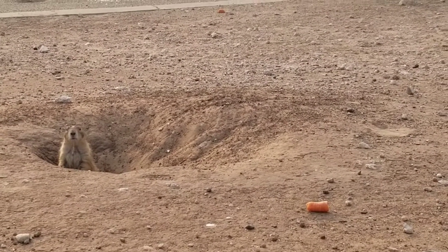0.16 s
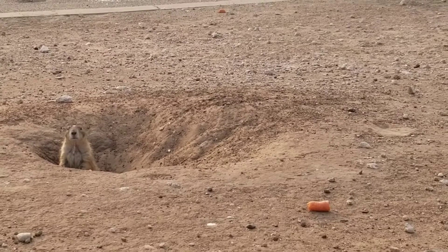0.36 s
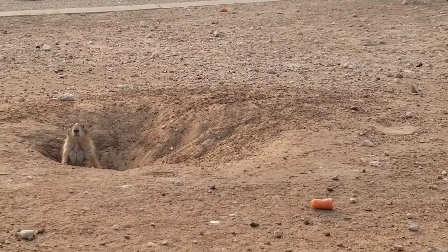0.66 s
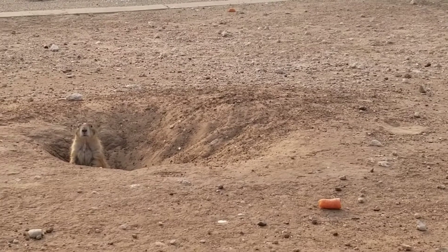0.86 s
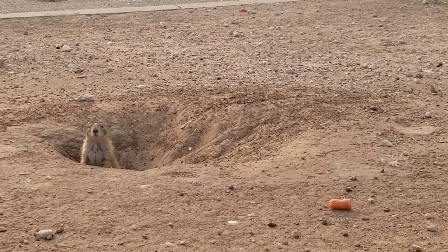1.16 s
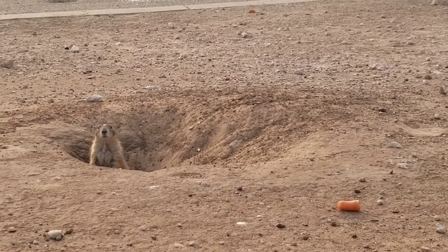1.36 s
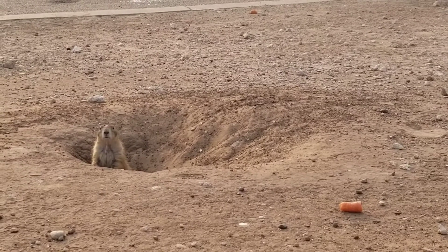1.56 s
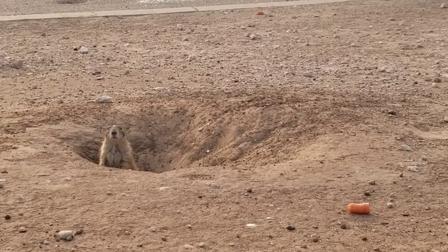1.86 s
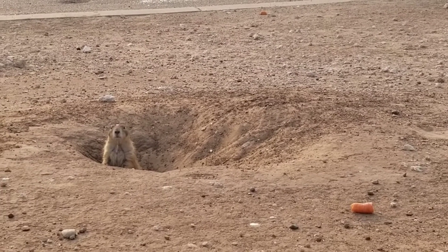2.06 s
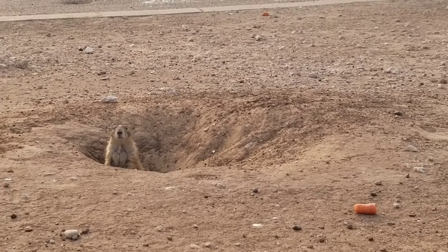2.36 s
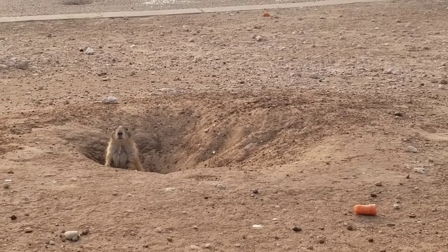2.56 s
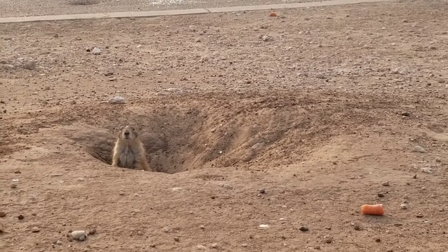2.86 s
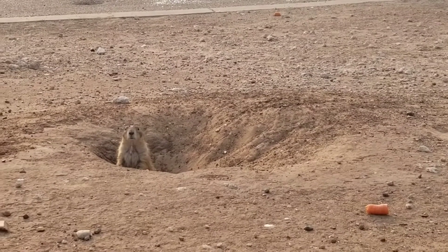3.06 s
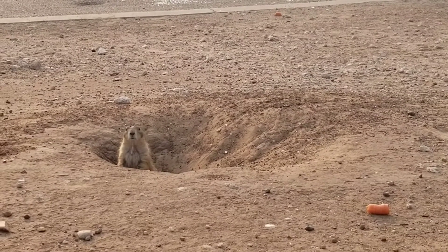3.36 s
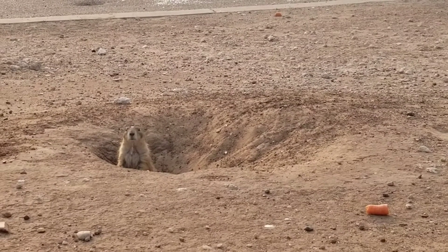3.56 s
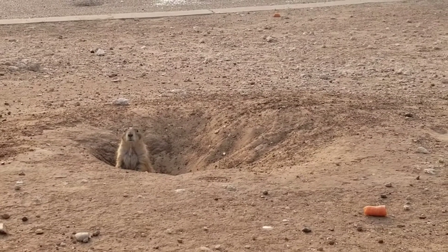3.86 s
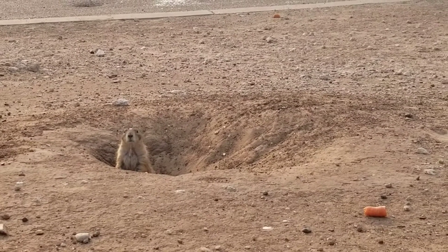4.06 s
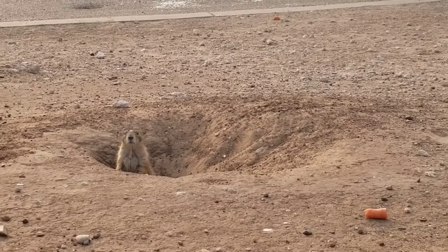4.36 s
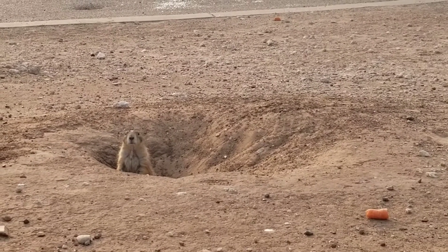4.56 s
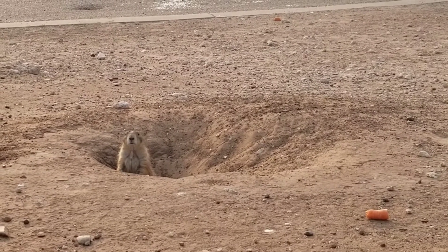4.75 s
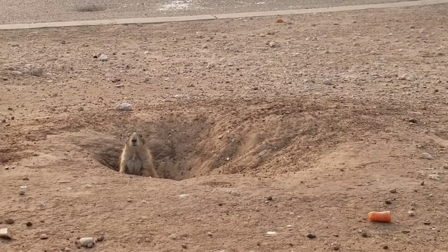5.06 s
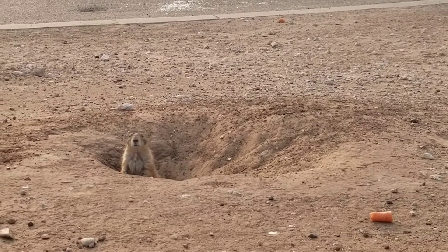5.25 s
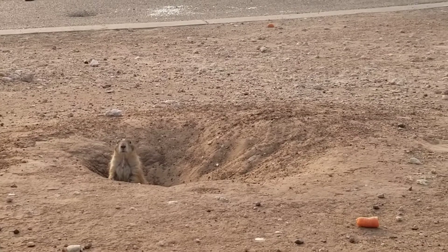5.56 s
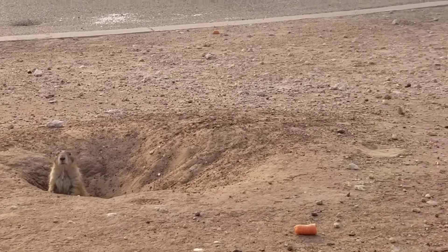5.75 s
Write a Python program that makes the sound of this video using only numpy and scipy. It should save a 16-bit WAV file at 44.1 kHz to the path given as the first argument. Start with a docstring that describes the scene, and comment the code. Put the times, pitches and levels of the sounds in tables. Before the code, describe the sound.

An open, windy dirt colony heard through an unprotected stereo microphone. A soft scuff and a gust open the scene, with low rumble, ragged flutter and dull thumps. A thin, cracking high bark comes at 0.2 s, a very faint distant one at 0.5, then more thin barks near 0.8, 1.1 and 1.4, the middle ones amid another gust around 0.8 to 1.3. The wind drops, and a close animal barks clearly at 1.9 s: a sharp, raspy chirp of about a twentieth of a second, falling at its end. Faint far yips follow every third of a second or so until 4. From 2.6 gusts return, thumping heavily between 3.2 and 4.8. The loudest close bark lands at 4.2, with others at 4.65 and 5.1. A thin bark at 5.4 and a faint one at 5.75 precede a last strong gust. Echoes are slight and diffuse.

```python
"""A windy, open dirt colony of prairie dogs: quiet outdoor air and a soft scuff open the scene.
Gusts soon buffet two microphone ports with rumble, flutter, crackle and dull thumps, and return throughout.
A neighbour with a thin cracking voice barks first, then animals far off, then one close by at its burrow.
Each bark is a short arch of pitch that turns harsh along the way and scatters faintly over the ground."""
import sys
import numpy as np
from scipy import signal
from scipy.fft import rfft, irfft, next_fast_len
from scipy.io import wavfile
from scipy.ndimage import map_coordinates

SR = 44100
rng = np.random.default_rng(int(sys.argv[2]) if len(sys.argv) > 2 else 0)


def unload_wav(signal):
    """Save mono or channel-first audio to the path in sys.argv[1] as 16-bit WAV at rate SR, clipped to [-1, 1]."""
    wavfile.write(
        sys.argv[1],
        SR,
        np.round(np.clip(np.atleast_2d(signal).T, -1, 1) * 32767).astype(np.int16),
    )


N = 259749  # samples in the scene


def amp(db):
    """Decibels to gain."""
    return 10 ** (np.asarray(db) / 20)


def unit(x):
    """Scale to an average (rms) strength of 1."""
    return x / np.sqrt(np.mean(x ** 2) + 1e-20)


def along(points, hz):
    """Read a curve of (frequency, value) points on a log-frequency axis."""
    f, v = np.transpose(points)
    return np.interp(np.log(hz + 1), np.log(f + 1), v)


def curves(rows, at):
    """Read each column after the first at the given places."""
    places, *columns = np.transpose(rows)
    return [np.interp(at, places, column) for column in columns]


def wobble(rate, n):
    """A smooth random curve through `rate` random points a second."""
    knots = rng.standard_normal(int(n * rate / SR) + 4)
    return map_coordinates(knots, [np.arange(n) * rate / SR + 1], mode="nearest")


def filtered(x, response):
    """Reshape a sound's spectrum by a function of frequency."""
    n = x.shape[-1]
    padded = next_fast_len(n + 4096)
    hz = np.fft.rfftfreq(padded, 1 / SR)
    return irfft(rfft(x, padded) * response(hz), padded)[..., :n]


def noise(spectrum):
    """Steady noise of rms 1, unrelated at the two ports."""
    return unit(filtered(rng.standard_normal((2, N)), lambda hz: amp(along(spectrum, hz))))


def panned(pan_db):
    """Left and right gains of mean power 1; positive means louder on the left."""
    gains = amp(np.array([[.5], [-.5]]) * pan_db)
    return gains / np.sqrt(np.mean(gains ** 2, axis=0))


def bump(hz, centre_hz, octaves):
    """A bell-shaped rise around one frequency, on a log axis."""
    return np.exp(-.5 * (np.log2((hz + 1) / centre_hz) / octaves) ** 2)


def add(track, s, sound):
    """Mix a sound into the track at time s."""
    start = max(round(s * SR), 0)
    track[:, start:start + sound.shape[1]] += sound[:, :N - start]


# Tone of the quiet air: (frequency [Hz], relative level [dB])
AIR_TONE = [(18, -45), (30, -6.5), (85, -3.5), (173, -19.5), (299, -8), (639, -19), (728, -20.5),
            (971, -22), (1510, -28), (1640, -30), (2070, -29), (2620, -32.5), (3590, -36), (9440, -42.5),
            (15500, -38.5)]
# How much the ports differ: (frequency [Hz], difference over sum [dB])
AIR_WIDTH = [(60, -4), (110, -2), (200, -9), (380, -11), (700, 0), (1290, 8.5), (2380, -2), (4400, 0),
             (8120, 1), (15000, -0.5)]


def air():
    """The quiet outdoor floor: noise partly shared by both ports."""
    mid, side = noise(AIR_TONE)
    side = filtered(side, lambda hz: amp(along(AIR_WIDTH, hz)))
    return amp(-57.5) * np.array([mid + side, mid - side])


# Soft rubs: (time [s], length [s], level before the fades [dB], centre [Hz], width [octaves])
SCUFFS = [(0, 0.038, -57.5, 1860, 0.15), (0.055, 0.08, -55, 1860, 0.23), (1.021, 0.046, -53.5, 2030, 0.24),
          (1.303, .03, -57, 2150, 0.096), (1.316, 0.081, -62.5, 2400, 0.28),
          (2.277, 0.063, -60, 2000, 0.12), (2.918, 0.17, -59, 1690, 0.38), (2.935, 0.11, -64, 4960, 0.58),
          (3.972, 0.054, -62, 6200, 0.35)]


def scuffs():
    """Brief soft rubs: uneven noise around one pitch that swells and fades."""
    out = np.zeros((2, N))
    for s, length, db, centre_hz, octaves in SCUFFS:
        n = int(length * SR)
        grit = rng.standard_normal((2, n)) * amp(3 * wobble(250, n))
        rub = unit(filtered(grit, lambda hz: bump(hz, centre_hz, octaves)))
        add(out, s, amp(db) * rub * signal.windows.tukey(n, .8))
    return out


STIFF_DB = -35  # strength of a typical gust
FLUTTER_DB, FLUTTER_GROWS = -37.5, 1.29  # level in a typical gust, dB gained per dB of strength
CRACKLE_DB, CRACKLE_GROWS = -56.5, 0.83  # level in a typical gust, dB gained per dB of flutter


def flutter_of(strength_db):
    """The stronger the wind, the more it flutters."""
    return amp(FLUTTER_DB + FLUTTER_GROWS * (strength_db - STIFF_DB))


def crackle_of(flutter):
    """The harder the flutter, the more it crackles."""
    return amp(CRACKLE_DB) * (flutter / amp(FLUTTER_DB)) ** CRACKLE_GROWS


def lumps(depth_db, rate):
    """Turbulent swells of mean power 1, different at each port."""
    return unit(amp(depth_db * np.tanh([wobble(rate, N), wobble(rate, N)])))


# Wind between gusts, before a random wobble: (time [s], strength [dB])
BREEZE = [(0, -49), (.6, -57), (1, -35.5), (1.48, -58), (1.7, -50.5), (2.1, -63), (2.38, -59.5),
          (2.55, -49), (2.75, -56), (3.2, -45), (4.2, -47), (4.95, -51), (5.3, -47.5), (5.89, -46.5)]
# Gusts: (time of full strength [s], hold [s], strength [dB], flutter boost [dB],
#         crackle boost [dB], left over right [dB])
GUSTS = [(0.046, 0.074, -30.5, 3, -2.5, -2.5), (0.244, 0.16, -41.5, -2.5, -11, -0.5),
         (0.854, 0.11, -42, 6.5, 7.5, -5), (1.028, 0.086, -39, 5.5, 0, 1),
         (1.192, 0.14, -33, -5.5, -3, 1.5), (2.585, 0.018, -35.5, -11.5, 4, 6),
         (2.817, 0.076, -34.5, 4.5, -5, -3), (2.929, .1, -45.5, -16, 16.5, -3),
         (3.155, 0.2, -41, 0.5, 3, 4), (3.52, 0.083, -36, -2.5, -2, -1), (3.634, 0.21, -37, 3, 4.5, -0.5),
         (3.895, 0.14, -39.5, -2, 2, 0.5), (4.307, 0.23, -33, -2.5, 2, -3),
         (4.625, .14, -32.5, -3.5, -3, -2), (5.056, 0.079, -30, -3, -0.5, -3.5),
         (5.151, 0.074, -34, -7, -2, 2), (5.36, 0.042, -40.5, -9.5, -8, -18),
         (5.485, 0.046, -36.5, -2.5, -20, -2), (5.687, 0.041, -33.5, -1.5, -1.5, -3),
         (5.766, 0.13, -28.5, -5.5, -6.5, -2.5)]
GUST_RISE_DB_PER_S, GUST_FALL_DB_PER_S = 323.5, 191.5


def gusts(t):
    """Each gust rises, holds and dies over the breeze: gains of rumble, flutter and crackle."""
    breeze_db = curves(BREEZE, t)[0] + 1.4 * wobble(7.2, N)
    # add powers here, and return to gains at the end
    rumble, flutter = amp(breeze_db) ** 2, flutter_of(breeze_db) ** 2
    crackle = crackle_of(flutter_of(breeze_db)) ** 2
    for s, hold, db, flutter_db, crackle_db, pan_db in GUSTS:
        rise_db = GUST_RISE_DB_PER_S * np.maximum(s - t, 0)
        fall_db = GUST_FALL_DB_PER_S * np.maximum(t - s - hold, 0)
        strength_db = db - rise_db - fall_db
        churn = amp(flutter_db) * flutter_of(strength_db)
        ports = panned(pan_db) ** 2
        rumble = rumble + ports * amp(strength_db) ** 2
        flutter = flutter + ports * churn ** 2
        crackle = crackle + ports * (amp(crackle_db) * crackle_of(churn)) ** 2
    return np.sqrt(rumble), np.sqrt(flutter), np.sqrt(crackle)


# Single eddies striking a port: (time [s], thump peak before softening [dB],
#         peak strength of flutter in the wake [dB], left over right [dB])
EDDIES = [(0.025, -26, -38, 5), (.056, -36, -31, -8), (0.111, -18, -39, 21), (0.179, -22, -37.5, -2),
          (0.276, -32, -64, 10), (0.838, -44, -47, 0), (1.001, -33, -33, -2), (1.045, -21.5, -30.5, 2),
          (1.096, -35, -20, -8.5), (1.181, -26, -43, -8), (1.237, -24, -29, -5), (2.665, -38, -41.5, 3),
          (2.818, -29, -35.5, 10), (3.188, -39, -33, -24), (3.287, -28, -35.5, -1), (3.33, -32, -48, 8),
          (3.421, -22, -46, -0.5), (3.455, -29, -43.5, -9), (3.587, -44, -45, -17), (3.651, -21, -30, -6),
          (3.765, -17.5, -23, -7.5), (3.811, -30, -27, -24), (3.902, -23, -35.5, -6.5), (4.01, -25, -33, 3),
          (4.126, -25.5, -63, -10), (4.341, -21, -29, -6.5), (4.389, -17.5, -28.5, 0.5),
          (4.453, -25, -29.5, 5), (4.514, -25.5, -28.5, 6), (4.584, -25.5, -32.5, -2),
          (4.637, -14.5, -30, -2.5), (4.698, -22, -24.5, -5.5), (4.764, -20, -48, 6.5),
          (4.829, -31, -38, 0), (5.098, -22, -24, -2.5), (5.699, -31, -37.5, -1), (5.72, -20, -54, 3.5),
          (5.776, -23.5, -24, -2.5), (5.857, -13, -31.5, -3)]


def wakes(peak_s=0.0082):
    """Each eddy drags a short burst of flutter behind it: these are the bursts' gains."""
    out = np.zeros((2, N))
    u = np.arange(SR // 10) / SR / peak_s
    for s, _, wake_db, pan_db in EDDIES:
        add(out, s, amp(wake_db) * panned(pan_db) * u * np.exp(1 - u))
    return out


# Tones of the wind, each: (frequency [Hz], relative level [dB])
RUMBLE_TONE = [(15, -31), (35, -3.5), (65, 2.5), (110, -1), (170, -7), (260, -19), (500, -53), (1000, -90)]
FLUTTER_TONE = [(70, -38.5), (150, -9.5), (230, -2), (400, 2.5), (520, -7), (750, -17), (1100, -39.5),
                (2200, -61.5), (6000, -57), (15000, -80.5)]
CRACKLE_TONE = [(400, -27), (800, 12), (1200, 2.5), (2000, -8.5), (3000, -24), (6000, -44.5),
                (15000, -48.5)]


def wind():
    """Gusts press on the ports: a slow rumble, a ragged flutter, and crackle on the flutter's crests."""
    push, churn, spit = gusts(np.arange(N) / SR)
    wake = wakes()
    rumble = push * amp(-0.5) * noise(RUMBLE_TONE) * lumps(depth_db=4.5, rate=38)
    swell = lumps(depth_db=3.5, rate=60) * lumps(depth_db=6.5, rate=220)
    flutter_gain = np.hypot(churn * swell, wake * lumps(depth_db=2, rate=220))
    flutter = flutter_gain * noise(FLUTTER_TONE)
    crackle_gain = np.hypot(spit, crackle_of(wake))
    crests = unit(swell * lumps(depth_db=12.5, rate=410))
    crackle = crackle_gain * noise(CRACKLE_TONE) * crests
    return rumble + flutter + crackle


def eddies(width_s=0.0019, swirl=0.4, soft_hz=650):
    """A passing eddy pushes, then sucks at the port: one dull thump."""
    out = np.zeros((2, N))
    t = np.arange(SR // 20) / SR
    for s, db, _, pan_db in EDDIES:
        # eddies vary in size around the typical width
        u = t / (width_s * np.exp(0.21 * rng.standard_normal()))
        push_and_suck = u * (2 - u) * np.exp(-u)
        thump = push_and_suck + swirl * u * np.exp(-u / 2) * wobble(947, len(t))
        add(out, s, amp(db) * panned(pan_db) * thump / np.abs(thump).max())
    return filtered(out, lambda hz: 1 / (1 + 1j * hz / soft_hz) ** 2)


def voice(progress, pitch_hz, ratio, harsh, rough, jitter, smear_hz, clean_partials, rasp):
    """Vocal folds buzz at the pitch; when pushed they shake and their upper partials break into a rasp."""
    n = len(progress)
    k = np.arange(1, 9)[:, None]  # partial numbers
    chaos = np.clip(rough * harsh, .08, 1)
    pitch = pitch_hz * ratio * (1 + jitter * chaos * wobble(700, n))
    # the lowest partials stay nearly locked to the pitch, the higher ones wander on their own
    loose_hz = smear_hz * chaos / (1 + np.exp(2 * (clean_partials - k)))
    partials_hz = k * pitch + loose_hz * [wobble(1200, n) for _ in k]
    phase = 2 * np.pi * np.cumsum(partials_hz, axis=1) / SR
    folds = np.cos(phase).sum(axis=0) * amp(2 * chaos * wobble(600, n))
    # air escapes in one puff per cycle
    puffs = rasp * (chaos + 0.31) * (1 + np.cos(phase[0])) * rng.standard_normal((2, n))
    return folds + puffs


def barks(table, course, throat, port_phase, **manner):
    """Each bark sweeps an arch of pitch, is coloured by throat and mouth, and reaches both ports."""
    out = np.zeros((2, N))
    for s, length, pitch_hz, arch, db, swell_db, rough, second_db, tilt_db, top_db, pan_db in table:
        n = int(length * SR)
        progress = np.linspace(0, 1, n)
        ratio, effort_db, harsh = curves(course, progress)
        buzz = voice(progress, pitch_hz, ratio ** arch, harsh, rough, **manner)
        loudness = amp(effort_db + swell_db * progress) * signal.windows.tukey(n, .06)
        source = np.pad(buzz * loudness, ((0, 0), (0, n // 4)))  # room for the throat to ring

        def response(hz):
            # mouth opening and head turn recolour each bark
            mouth_db = second_db * bump(hz, 2 * pitch_hz, 0.18) + top_db * bump(hz, 13000, 0.082)
            colour_db = along(throat, hz) + mouth_db + tilt_db * np.log2((hz + 1) / pitch_hz)
            ports = np.exp(np.outer([.5, -.5], 1j * along(port_phase, hz)))
            # the left port hears more of the low partials, the right more of the treble
            shade_db = along([(2000, 5.0), (4500, 1.5), (8000, -2.0)], hz)
            return amp(colour_db) * ports * panned(pan_db + shade_db)

        add(out, s, amp(db - 3.0) * unit(filtered(source, response)))
    return out


# Neighbour's barks: (time [s], length [s], pitch [Hz], depth of the pitch arch [power of its ratio],
#         level before a shared 3 dB cut [dB], swell over the bark [dB], roughness [0-1],
#         second harmonic boost [dB], treble tilt [dB per octave], boost near 13 kHz [dB],
#         left over right before the shared port shading [dB])
NEIGHBOUR_BARKS = [(.208, 0.053, 1774, 0.53, -45, 10.5, 0.89, 12.5, 3.5, -16, 0.5),
                   (.767, 0.0094, 1710, 0.39, -48, -2, .3, -16, 0, 0, 0),
                   (.786, 0.048, 1728, 0.46, -46, 33, 1, -4, 0.5, 5, 0),
                   (1.088, 0.08, 1716, 1.11, -47.5, 0, 0.96, 2, -1.5, 9.5, 0),
                   (1.418, 0.072, 1738, 0.88, -47, 13.5, .3, 1, 0.5, -15, -1),
                   (5.416, 0.067, 1780, 1.27, -47.5, -1.5, 0.16, 4, -5, 11, 2)]
# A bark whose pitch cracks upward: (share of its length [0-1], pitch ratio, effort [dB], harshness [0-1])
CRACKED_COURSE = [(0, .94, -12, .1), (.1, .965, -6, .1), (.35, .98, -6, .15), (.38, 1.035, 4, .9),
                  (.53, 1.005, 2, .9), (.68, .98, -1, .3), (.9, .945, -2, .2), (1, .9, -16, .3)]
# The thin voice as it arrives: (frequency [Hz], level [dB])
THIN_THROAT = [(700, -7), (1650, 6), (2600, -35.5), (3550, -18), (4400, -55), (5400, -9), (6200, 0),
               (6850, 0.5), (8200, -24), (10500, -8.5), (13000, -10), (15500, -10.5)]
# Lead of the left port for neighbour and far animals: (frequency [Hz], phase [radians])
COLONY_PHASE = [(1700, 3), (3500, 1), (5300, 2), (6900, 0), (13000, 5)]


def neighbour_barks():
    """A thin voice whose pitch jumps up as the folds crack."""
    return barks(NEIGHBOUR_BARKS, CRACKED_COURSE, THIN_THROAT, COLONY_PHASE,
                 jitter=.01, smear_hz=1300, clean_partials=5.3, rasp=.7)


# Far barks: (time [s], length [s], pitch [Hz], depth of the pitch arch [power of its ratio],
#         level before the 3 dB cut [dB], second harmonic boost [dB], left over right before shading [dB])
FAR_BARKS = [(.503, .055, 1777, .7, -61, 12, 2), (1.718, 0.042, 1802, 0.87, -60, 0.5, 3),
             (2.042, 0.057, 1870, .7, -53.5, 8.5, 2), (2.37, 0.061, 1900, .6, -61.5, 0.5, 3),
             (2.672, 0.05, 1878, .6, -57.5, 6, 2), (2.947, 0.06, 1807, 0.53, -58, 12, 7),
             (3.308, .055, 1797, .8, -59.5, 7, 4.5), (3.618, 0.051, 1754, 0.92, -65.5, -4.5, 3),
             (3.995, .027, 2760, 3.4, -54, -12, 2), (4.302, .048, 1733, 0.94, -62, -9, 1),
             (4.878, .05, 1744, 0.99, -70, 1, 5.5), (5.747, 0.053, 1770, .5, -60.5, 0, 3.5)]
# Course of a far bark: (share of its length [0-1], pitch ratio, effort [dB], harshness [0-1])
FAR_COURSE = [(0, .95, -13.5, 0.31), (0.198, .995, 10.5, .5), (.42, 1, 12, 0.88), (.7, 0.92, 7.5, .7),
              (1, .88, -5, 0.89)]
# The far voices as they arrive: (frequency [Hz], level [dB])
FAR_THROAT = [(700, -35.5), (1800, -4), (2700, -2), (3600, 0.5), (4600, -8.5), (5400, -1.5), (7000, -0.5),
              (8500, -42), (14000, -14)]


def far_barks(swell_db=1, rough=0.78, tilt_db=0, top_db=0):
    """Faint barks of far animals, all with the same swell, roughness and tilt."""
    calls = []
    for s, length, pitch_hz, arch, db, second_db, pan_db in FAR_BARKS:
        calls.append((s, length, pitch_hz, arch, db, swell_db, rough, second_db, tilt_db, top_db, pan_db))
    return barks(calls, FAR_COURSE, FAR_THROAT, COLONY_PHASE,
                 jitter=.015, smear_hz=550, clean_partials=3.3, rasp=.7)


# Close barks: same columns and units as NEIGHBOUR_BARKS, from (time [s], length [s], pitch [Hz], ...
NEAR_BARKS = [(1.876, 0.065, 2042, 1.17, -24, -2, 0.92, 7.5, 1, -3, -1),
              (4.190, .056, 2230, 1.1, -18, -8, 0.9, 10.5, 1.85, -2, -0.5),
              (4.645, 0.061, 2004, 0.81, -26, -3, 0.3, 4.5, 2, -16, -1),
              (5.126, .055, 1978, 0.82, -28.5, 2, .7, 0, 2, -12, -3.5)]
# Course of a close bark: (share of its length [0-1], pitch ratio, effort [dB], harshness [0-1])
NEAR_COURSE = [(0, .92, -24, .15), (.07, .97, -7, .15), (.2, .995, -2, .6), (.36, 1, 0, 1),
               (.55, .975, -1, .9), (.78, .905, -1, .5), (.9, .83, -8, .55), (1, .73, -19, .75)]
# The close voice as it arrives: (frequency [Hz], level [dB])
NEAR_THROAT = [(500, -11.5), (1200, -20), (1700, 2.5), (2250, 0), (2700, -0.5), (3300, -3.5), (4100, 6),
               (4900, -12), (5700, -3), (7200, 3.5), (8600, -11), (9900, -7), (11400, -23.5), (13000, 0.5),
               (14200, -16), (15000, -42)]
# Lead of the left port for the close animal: (frequency [Hz], phase [radians])
NEAR_PHASE = [(2000, 1.43), (4000, 4.56), (6000, 7.2), (7400, 9), (9700, 11.8), (13000, 13.5)]


def near_barks():
    """The close animal at its burrow: a full voice with a strong rasp of escaping air."""
    return barks(NEAR_BARKS, NEAR_COURSE, NEAR_THROAT, NEAR_PHASE,
                 jitter=.022, smear_hz=900, clean_partials=3, rasp=1.15)


# Echo decay, multiplied by t60_share below: (frequency [Hz], time to fall 60 dB at share 1 [s])
GROUND = [(1000, 0.59), (4200, 0.85), (8000, 1), (14000, 0.1)]


def scatter(x, t60_share):
    """Mounds and distant walls return a diffuse tail whose highest treble dies first."""
    hz, t, z = signal.stft(rng.standard_normal((2, SR // 2)), SR, nperseg=256)
    t60 = t60_share * along(GROUND, hz)[:, None]
    tail = signal.istft(z * amp(-60 * t / t60), SR, nperseg=256)[1]
    return signal.fftconvolve(x, tail / np.linalg.norm(tail[0]), axes=1)[:, :N]


def scene():
    """Three distances of barking and their echoes, in the wind."""
    weather = air() + scuffs() + wind() + eddies()
    neighbour, far, near = neighbour_barks(), far_barks(), near_barks()
    voices = neighbour + far + near
    close_echo = scatter(amp(-26) * near + amp(-17) * neighbour + amp(-10) * far, t60_share=.22)
    distant_echo = scatter(amp(-41) * voices, t60_share=1.4)
    return weather + voices + close_echo + distant_echo


def record(dry, low_cut_hz=36, top_hz=15700):
    """The deepest bass is thinned and nothing is kept from the upper band limit on."""
    return filtered(dry, lambda hz: hz ** 2 / np.hypot(hz ** 2, low_cut_hz ** 2) * (hz < top_hz))


dry = scene()
out = record(dry)
unload_wav(out)
```